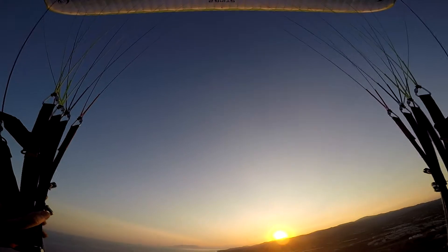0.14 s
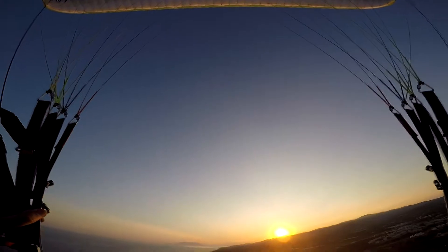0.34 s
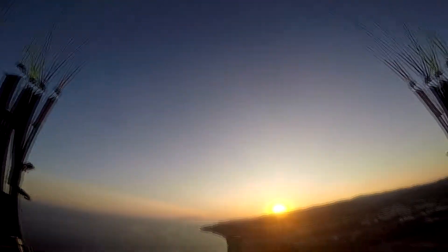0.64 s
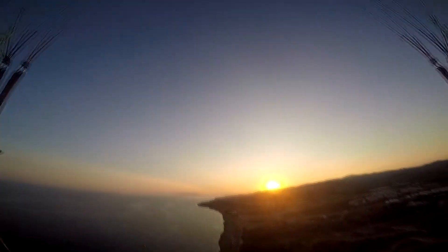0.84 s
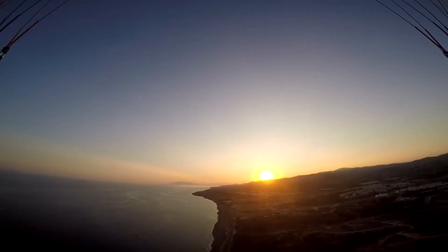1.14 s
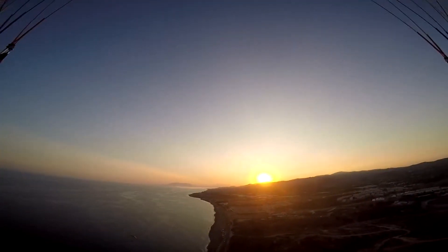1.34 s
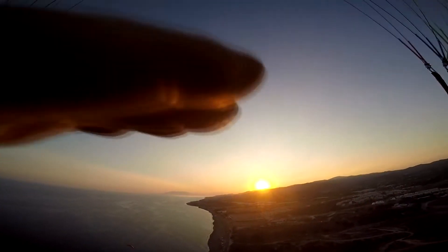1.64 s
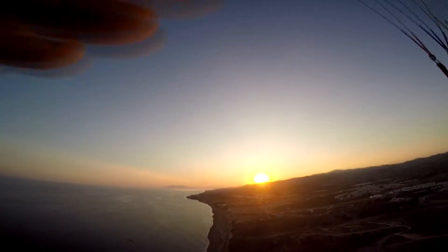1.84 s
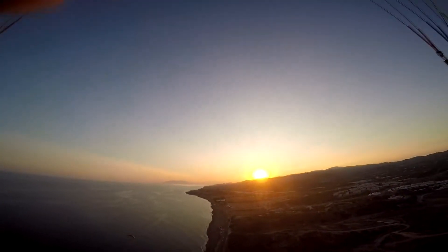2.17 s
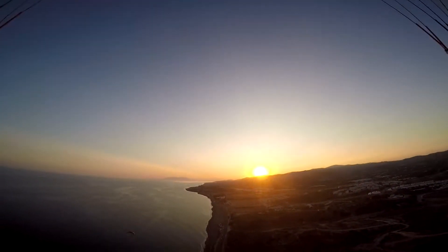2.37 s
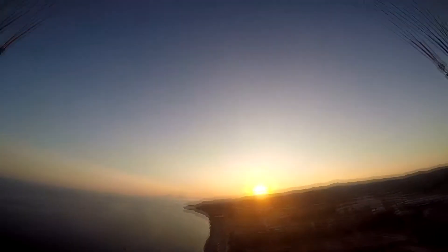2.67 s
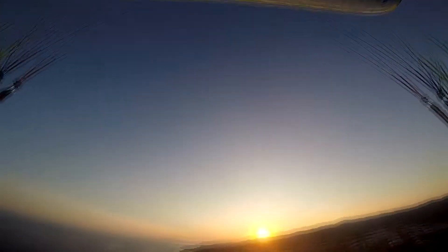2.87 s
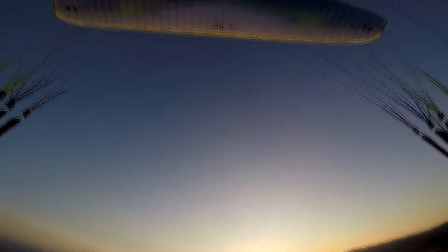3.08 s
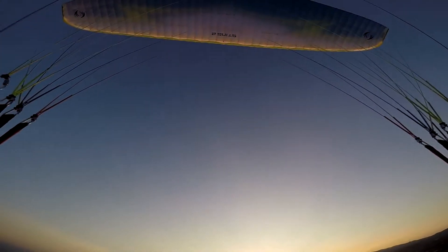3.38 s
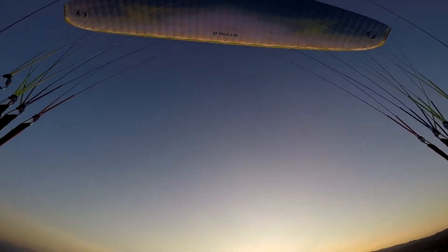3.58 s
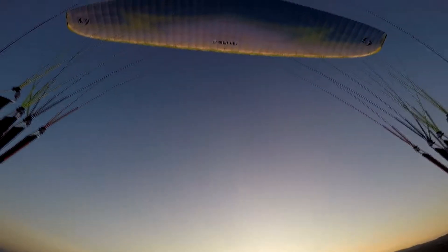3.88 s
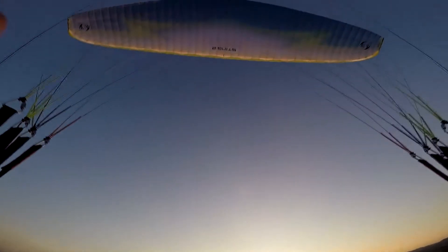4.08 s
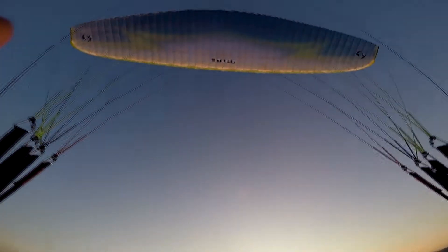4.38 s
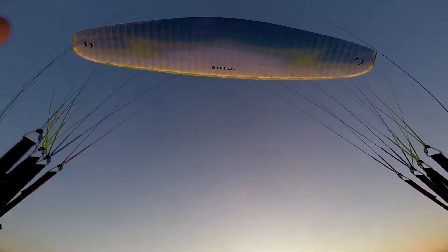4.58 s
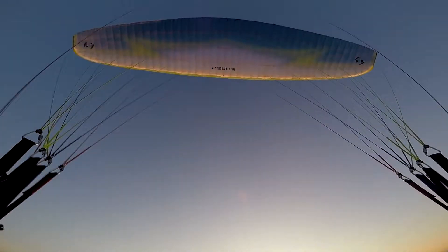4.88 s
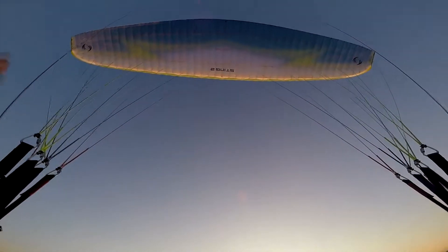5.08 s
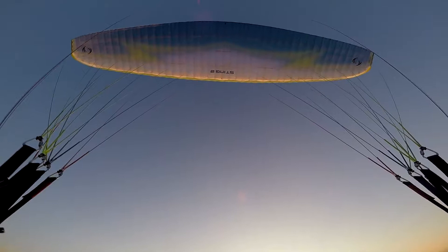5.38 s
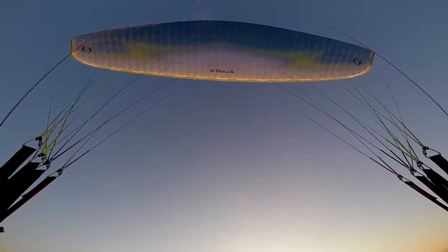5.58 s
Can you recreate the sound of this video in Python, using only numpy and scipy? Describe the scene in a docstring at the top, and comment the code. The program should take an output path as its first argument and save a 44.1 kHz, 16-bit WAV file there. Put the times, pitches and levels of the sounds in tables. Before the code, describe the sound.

A small two-stroke motor and its propeller run without pause for about 5.7 seconds, close behind a microphone on the pilot's helmet in open air. A low drone near 72 beats a second carries fast slapping overtones, a raspy midrange roar and a fluttering hiss. Above it the engine buzzes and rings with a thin metallic whine near 1.9 kHz. Speed dips very slightly at first, then creeps up. From about 1.3 s a raised arm subtly shades the sound, and small low bumps hit the microphone near 1.7 and 1.9 s. The drone sags briefly around 2, 2.3 and 2.6 s. Between 2.4 and 3.1 s the head tips back: wind rumble swells, with stronger thumps around 3 s, fading by 4 s. The tone becomes raspier with less hiss; the whine grows stronger near 4.7 s, and the motor is still running at the end.

```python
"""A propeller drones and chops the air: a paramotor at steady throttle, heard from the pilot's helmet.
Overtones of the blade rate make the drone and slap; noise pulsed by the two blades makes the hiss and rasp.
The two-stroke engine, geared faster, buzzes in firing tones and rings near 1.9 kHz in filtered noise.
An arm goes up and the head tips back, which changes the colour; the airstream rumbles and buffets the
microphone in shaped noise and short low thumps."""
import sys
import numpy as np
from scipy import signal
from scipy.fft import rfft, irfft
from scipy.io import wavfile

SR = 44100
rng = np.random.default_rng(int(sys.argv[2]) if len(sys.argv) > 2 else 0)


def to_wav(s):
    """Save 16-bit WAV."""
    ch = np.atleast_2d(s).T  # columns
    pcm = np.round(np.clip(ch, -1, 1) * 32767)  # PCM
    wavfile.write(sys.argv[1], SR, pcm.astype(np.int16))


N = 252238
TIME = np.arange(N) / SR  # s
FREQS = np.fft.rfftfreq(N, 1 / SR)  # Hz


def from_db(db):
    """Decibels to gain."""
    return 10 ** (np.asarray(db) / 20)


def rms_one(x):
    """Scale to unit rms."""
    return x / np.sqrt(np.mean(x ** 2) + 1e-20)


def in_time(rows):
    """Each column of a curve, drawn in straight lines, at every sample."""
    start_s, *columns = np.transpose(rows)
    return [np.interp(TIME, start_s, column) for column in columns]


def drift(rate):
    """Slow random curve of spread 1 that changes about rate times a second."""
    step = 40  # samples between random draws
    settle = 2000  # first draws, dropped while the filter settles
    r = np.exp(-2 * np.pi * rate * step / SR)
    noise = rng.standard_normal(N // step + 2 + settle)
    slow = signal.lfilter([1], [1, -2 * r, r * r], noise)[settle:]
    return np.interp(np.arange(N) / step, np.arange(len(slow)), rms_one(slow))


def colour(x, spectrum):
    """Give x a spectrum that falls 30 dB an octave further beyond its ends; rms 1."""
    hz, level_db = np.transpose(spectrum)
    octave, knots = np.log2(FREQS + 1e-3), np.log2(hz)
    outside = np.abs(octave - np.clip(octave, knots[0], knots[-1]))
    gain = from_db(np.interp(octave, knots, level_db) - 30 * outside)
    return rms_one(irfft(rfft(x) * gain, N))


def resonate(x, hz, width_hz):
    """One two-pole resonance; rms 1."""
    r = np.exp(-np.pi * width_hz / SR)
    return rms_one(signal.lfilter([1, 0, -1], [1, -2 * r * np.cos(2 * np.pi * hz / SR), r * r], x))


def puff(turns, at, sharp):
    """A smooth bump of height 1 once a cycle."""
    return np.exp(sharp * (np.cos(2 * np.pi * (turns - at)) - 1))


def by_pose(ahead, up, pose):
    """Blend a value between looking ahead and looking up."""
    return (1 - pose) * ahead + pose * up


def tone_db(tones, k, pose):
    """Level of the k-th tone as the head turns between its two poses."""
    multiple, ahead_db, up_db = np.transpose(tones)
    return by_pose(np.interp(k, multiple, ahead_db), np.interp(k, multiple, up_db), pose)


def arm_raised():
    """The pilot holds an arm up beside the helmet: 0 with it down, 1 with it up."""
    up_s, down_s, move_s = 1.32, 5.03, 0.14
    return np.clip(0.5 + np.minimum(TIME - up_s, down_s - TIME) / move_s, 0, 1)


def propeller_tones(blade, pose, arm, waver_db, smear):
    """Each blade pushes a pressure pulse; the frame and the pilot's body scatter its overtones."""
    # the drone sags and recovers: centre_s, depth_db, half_length_s (to 1/e of the depth)
    sags = [(1.97, 4.5, 0.067), (2.31, 3, 0.037), (2.58, 5.5, 0.11), (3.136, 5, 0.032)]
    # shared swing of the low overtones, used about its mean: start_s, level_db
    fullness = [(0, -36), (0.45, -37.5), (0.85, -47), (1.5, -43.5), (2.3, -44), (3.1, -36), (3.7, -36.5),
                (4.6, -32), (5.2, -38.5), (5.72, -40)]
    # second to seventh overtones: mean_db, share_of_swing, arm_up_change_db
    low_overtones = [(-39, 1, -1), (-47.5, 0.58, 3), (-48, 0.66, -4), (-48, 0.24, -14.5), (-57.5, 0.45, 2),
                     (-57, .2, 7)]
    # scattered overtones: multiple_of_blade_rate, looking_ahead_db, looking_up_db
    blade_tones = [(8, -63, -53), (9.99, -51, -49), (11, -76, -70), (11.99, -46, -58.5), (15.1, -48.5, -62),
                   (16.9, -49, -42), (18.4, -51.5, -43), (20.93, -43.5, -48), (21.9, -60.5, -61),
                   (23.8, -41.5, -51), (24.62, -53, -38), (26, -70, -78), (31.8, -46.5, -59),
                   (33.27, -66, -42), (36.8, -54.5, -62), (39.4, -51.5, -55), (41.7, -71, -69)]
    drone_db, drone_arm_db = -21.5, -1.6  # the raised arm shades the drone as the head looks up

    sag_db = sum(depth_db * np.exp(-((TIME - s) / length) ** 2) for s, depth_db, length in sags)
    fullness_db, = in_time(fullness)
    swing_db = fullness_db - fullness_db.mean()
    lows_db = [drone_db + drone_arm_db * arm * pose - sag_db + 0.54 * drift(5.7)]
    lows_db += [mean_db + share * swing_db + arm_db * arm for mean_db, share, arm_db in low_overtones]
    out = sum(from_db(db) * np.cos(2 * np.pi * k * blade) for k, db in enumerate(lows_db, 1))
    for k in range(8, 43):
        level_db = tone_db(blade_tones, k, pose) + waver_db * drift(20.0)
        # higher overtones arrive later, which stretches the pulse into a short slap
        arrival = 0.62 + 0.004285 * k  # blade passes
        phase_smear = smear * k / 20 * drift(6.3)  # radians
        out += from_db(level_db) * np.cos(2 * np.pi * k * (blade - arrival) + phase_smear)
    return np.sqrt(2) * out  # the levels are rms


def chopped_air(blade, pose, arm, between, uneven_db):
    """Turbulence swells as a blade cuts the wake of the frame: first a hiss, then a rasp."""
    # rasp level before its trim: start_s, level_db
    rasp_level = [(0, -35.5), (0.7, -34), (1.3, -32), (1.9, -34.5), (2.4, -32.5), (2.75, -32),
                  (3.05, -29.5), (4.0, -30.5), (4.75, -31), (5.15, -33), (5.72, -34.5)]
    rasp_trim_db = 1.56
    # noise colours, looking ahead and looking up: pitch_hz, relative_level_db (per Hz)
    rasp_ahead, rasp_up = [(100, -6), (250, -4.5), (450, -10), (750, -2), (1000, -2), (1400, 2.5),
                           (1620, 2), (1800, 1.5), (2020, -6), (2400, -0.5), (2750, -2.5), (3050, -15.5),
                           (3850, -23), (4600, -35)], [(100, -7), (250, -3.5), (450, -7.5), (850, -6.5), (1300, 3),
                                               (1620, -4), (1850, 9), (2150, -6.5), (2500, -1.5),
                                               (2850, -6), (3100, -15.5), (3450, -18), (3750, -9.5),
                                               (4600, -55)]
    hiss_ahead, hiss_up = [(3500, 2.5), (4600, -3), (5200, 0), (6200, -10), (7100, -7.5), (7550, -17),
                           (8500, -14.5), (9500, -15.5), (10600, -12.5), (12500, -24), (15300, -26)], [(3500, -6.5), (4600, -1), (5500, 2.5), (6500, -4),
                                               (7100, -4), (7600, -7), (8500, -6.5), (9300, -9.5),
                                               (10300, -6.5), (12500, -12), (15300, -17)]
    # hiss level in each pose, and the raised arm's effect on it
    hiss_ahead_db, hiss_ahead_arm_db = -43.5, -3
    hiss_up_db, hiss_up_arm_db = -51.5, 2

    rasp_db, = in_time(rasp_level)
    hiss_db = by_pose(hiss_ahead_db + hiss_ahead_arm_db * arm, hiss_up_db + hiss_up_arm_db * arm, pose)
    swell = puff(blade, at=0.81, sharp=0.99) * from_db(uneven_db * drift(54))
    rough = (between + swell) * rng.standard_normal(N)
    tip_spit = 0.73 * puff(blade, at=0.61, sharp=14.0) * from_db(4.8 * drift(60))
    fine = (1.08 + puff(blade, at=0.58, sharp=0.59) + tip_spit) * rng.standard_normal(N)
    rasp = by_pose(colour(rough, rasp_ahead), colour(rough, rasp_up), pose)
    hiss = by_pose(colour(fine, hiss_ahead), colour(fine, hiss_up), pose)
    return from_db(rasp_db + rasp_trim_db) * rasp + from_db(hiss_db) * hiss


def exhaust(firing, pose, waver_db, wander):
    """The firing tones; cycle-to-cycle scatter makes the high ones less steady."""
    # exhaust tones: multiple_of_firing_rate, looking_ahead_db, looking_up_db
    firing_tones = [(1.04, -36.5, -38.5), (1.98, -64, -68), (2.97, -61.5, -57.5), (3.94, -57, -64.5),
                    (6.75, -65.5, -44), (8.1, -62, -70.5), (9.6, -44.5, -44), (10.7, -59.5, -50),
                    (11.7, -60, -37.5), (12.4, -37.5, -53), (14, -54, -56), (15.3, -63, -49),
                    (16.2, -60, -50.5), (18.3, -45, -36.5), (18.4, -42, -54), (18.6, -63, -50),
                    (28, -59, -55)]
    timing = firing + wander * drift(8.9)  # wander in firing cycles
    out = 0
    for k in range(1, 29):
        level_db = tone_db(firing_tones, k, pose) + waver_db * np.sqrt(k / 20) * drift(10.6)
        out = out + from_db(level_db) * np.cos(2 * np.pi * (k * timing + rng.random()))
    return np.sqrt(2) * out  # the levels are rms


def engine_ring(blade, firing, pose, arm, ring_db, whine_db):
    """Every firing rattles the casing; the firing tone that meets its ring whines, and the blades make it flutter."""
    # casing resonances: pitch_hz, width_hz (of the first of two passes), relative_level_db
    ring_modes = [(1790, 140, -7.5), (1806, 90, -4.5), (1882, 31, 0)]
    # shared level of the casing before its trim: start_s, level_db
    ring_level = [(0, -32.5), (0.35, -37.5), (0.75, -34), (1.55, -32.5), (1.95, -36), (2.2, -31),
                  (2.5, -36), (3.2, -34), (3.8, -33.5), (4.7, -28), (5.4, -30.5), (5.72, -29.0)]
    ring_trim_db = 0.36
    whine_multiple = 19  # the firing tone that falls on the ring
    upper_hz, upper_width_hz = 3810, 790  # broad upper resonance
    upper_ahead_db, upper_up_db, upper_arm_db = -16.5, -16, -13.5  # against the shared level

    level_db, = in_time(ring_level)
    rattles = (1 + puff(firing, at=0, sharp=2.8)) * rng.standard_normal((len(ring_modes), N))
    ring = sum(from_db(db) * resonate(resonate(rattle, hz, width), hz, 2 * width)
               for rattle, (hz, width, db) in zip(rattles, ring_modes))
    whine = np.cos(2 * np.pi * whine_multiple * firing + 0.5 * drift(8)) * from_db(1.1 * drift(25))
    casing = from_db(level_db + ring_trim_db) * (from_db(ring_db) * ring + from_db(whine_db) * whine)
    flutter = rms_one(1 + 0.55 * puff(blade, at=0.82, sharp=1))

    upper = rng.standard_normal(N) * (0.37 + puff(blade, at=0.66, sharp=1.0))
    for _ in range(2):
        upper = resonate(upper, upper_hz, upper_width_hz)
    # looking ahead, the arm shades the microphone from the engine behind it
    upper_db = level_db + by_pose(upper_ahead_db + upper_arm_db * arm, upper_up_db, pose)
    return flutter * casing + from_db(upper_db) * upper


def wind(lumpy_db):
    """Lumpy rumble on the microphone port, and single eddies that thump on it."""
    # airstream rumble: pitch_hz, relative_level_db (per Hz)
    rumble_colour = [(10, -4), (25, 3.5), (40, 4.5), (70, -5), (140, -4), (300, -27), (800, -63)]
    # single buffets: centre_s, peak_db, pitch_hz
    buffets = [(1.715, -24, 35), (1.917, -19, 30), (2.608, -25.5, 156), (2.67, -25, 40), (3.03, -23.5, 242),
               (3.033, -17.5, 110), (3.109, -16, 50.6)]
    # a steady flow, and one gust as the head tips back
    flow_db, gust_db = -43, 13
    gust_s, rise_s, fall_s = 3.2, 0.8, 0.84

    gust = np.interp(TIME, [gust_s - rise_s, gust_s, gust_s + fall_s], [0, 1, 0])
    rumble = colour(rng.standard_normal(N) * from_db(lumpy_db * drift(23)), rumble_colour)
    out = from_db(flow_db + gust_db * gust) * rumble
    for s, peak_db, hz in buffets:
        age = TIME - s
        bump = np.exp(-(age / 0.005) ** 2)
        out += from_db(peak_db) * bump * np.cos(2 * np.pi * hz * age)
    return out


def scene():
    """Propeller and engine turn together through the reduction drive."""
    # cruise: start_s, blade_passes_hz
    speed = [(0, 72.3), (0.25, 71.51), (0.5, 71.24), (0.7, 71.33), (1, 71.9), (1.4, 72.38), (1.8, 72.84),
             (2.1, 73.12), (2.5, 73.0), (2.8, 73.16), (3.2, 73.67), (3.6, 73.36), (4.1, 73.45),
             (4.6, 73.47), (5, 73.18), (5.4, 73.16), (5.72, 72.9)]
    # head pose: start_s, tilt (0 looking ahead, 1 looking up)
    head_pose = [(0, 0.21), (.45, 0.14), (.8, 0.085), (1.5, 0.2), (2.4, 0.098), (3.1, 0.97), (4.65, 0.87),
                 (5.1, 0.76), (5.72, 0.79)]
    firings_per_blade = 1.357

    blade_hz, = in_time(speed)
    pose, arm = np.clip(in_time(head_pose)[0], 0, 1), arm_raised()
    blade = np.cumsum(blade_hz) / SR  # blade passes so far
    firing = firings_per_blade * blade  # firings so far
    propeller = propeller_tones(blade, pose, arm, waver_db=2.5, smear=0.77)
    propeller = propeller + chopped_air(blade, pose, arm, between=0.34, uneven_db=2.0)
    engine = exhaust(firing, pose, waver_db=2.0, wander=0.00095)
    engine = engine + engine_ring(blade, firing, pose, arm, ring_db=-5.0, whine_db=-2.0)
    return (propeller + engine + wind(lumpy_db=4.5))[None]


def record(dry):
    """The top is cut steeply; the ends are eased over a few milliseconds."""
    ease = np.clip(np.minimum(TIME, TIME[-1] - TIME) / 0.004, 0, 1)
    # 0.1 dB passband ripple, 90 dB stopband, passband edge in Hz
    low_pass = signal.ellip(12, 0.1, 90, 15250, fs=SR, output="sos")
    return signal.sosfilt(low_pass, dry * ease)


dry = scene()
out = record(dry)
to_wav(out)
```